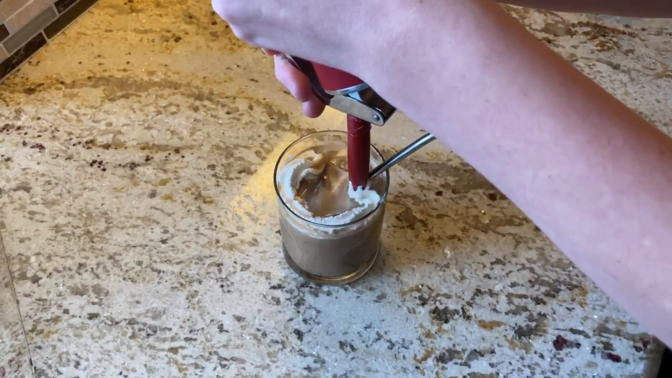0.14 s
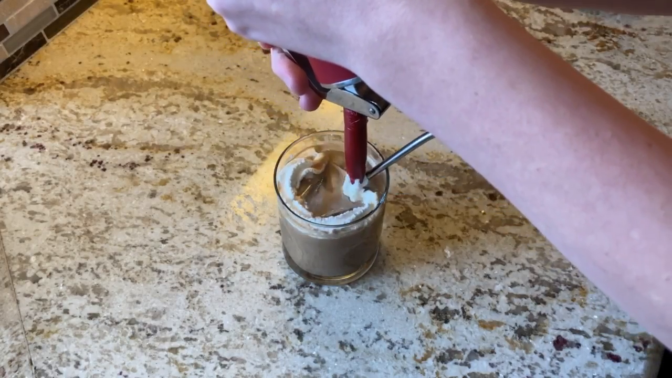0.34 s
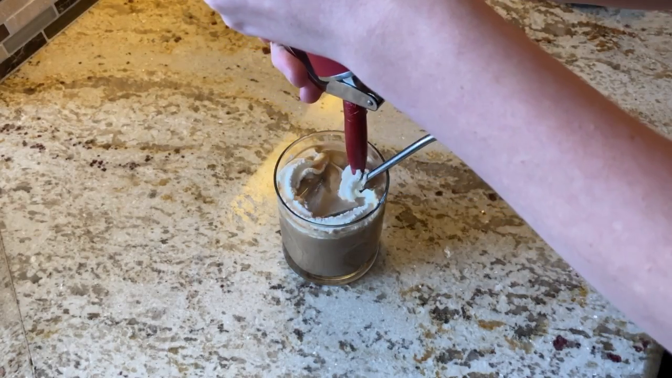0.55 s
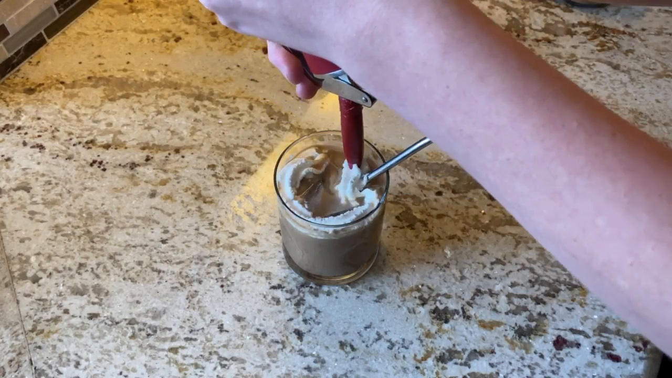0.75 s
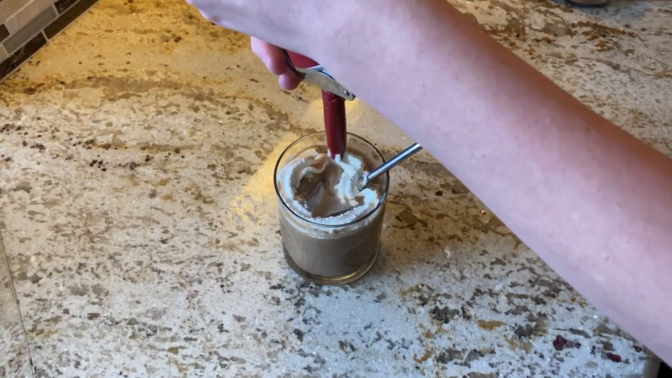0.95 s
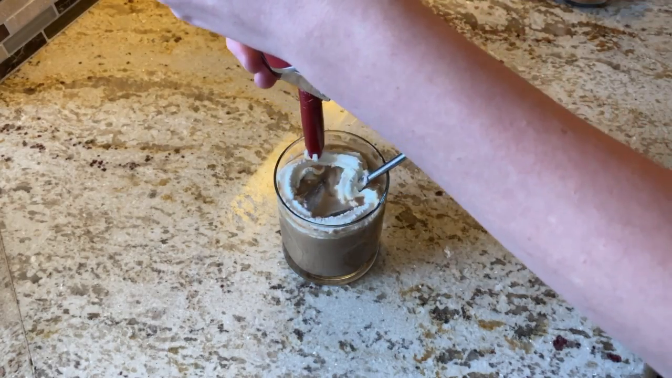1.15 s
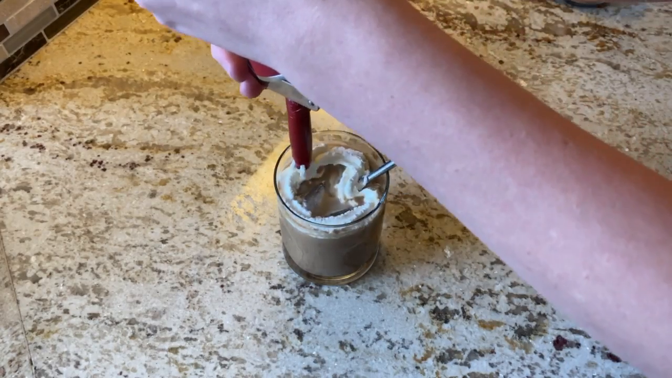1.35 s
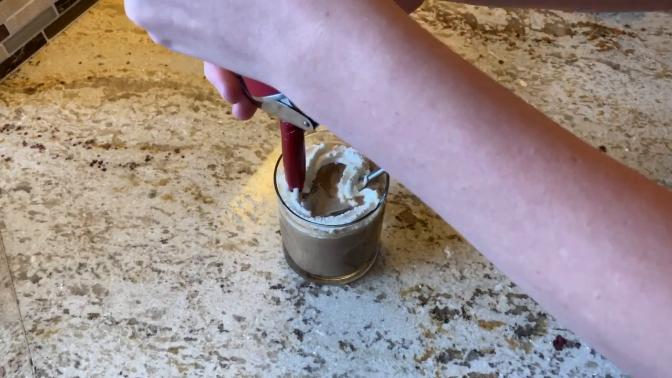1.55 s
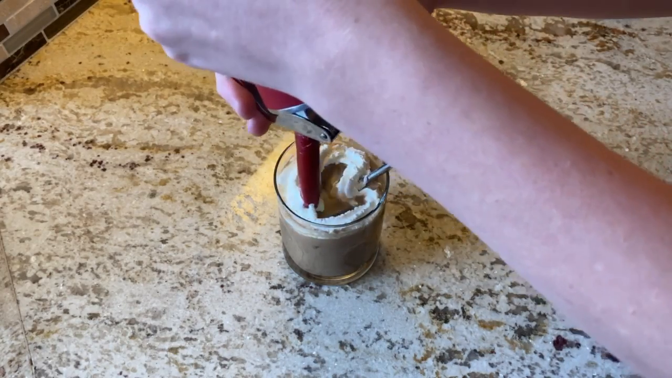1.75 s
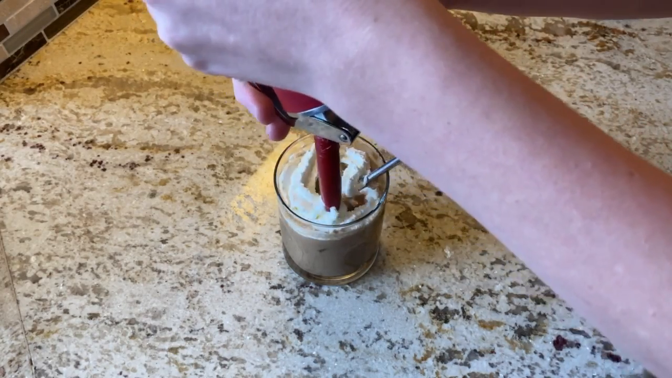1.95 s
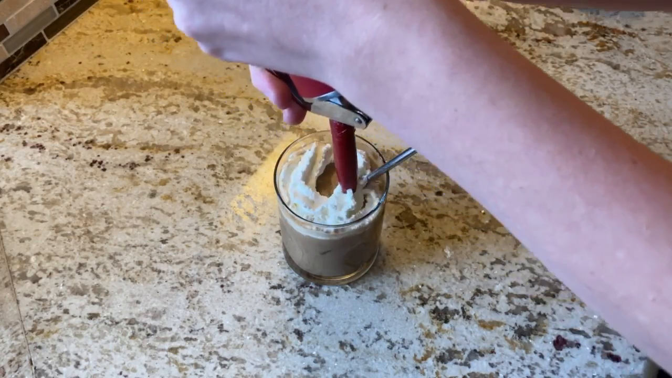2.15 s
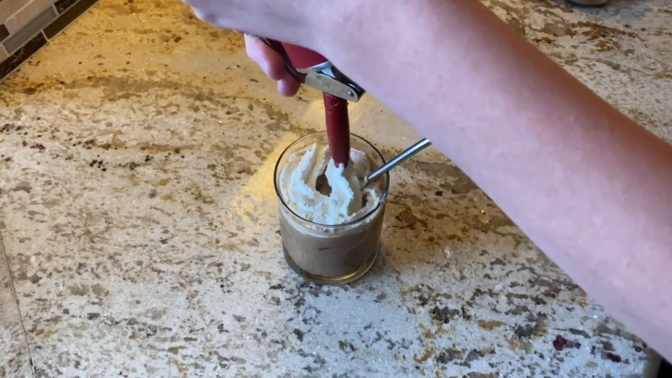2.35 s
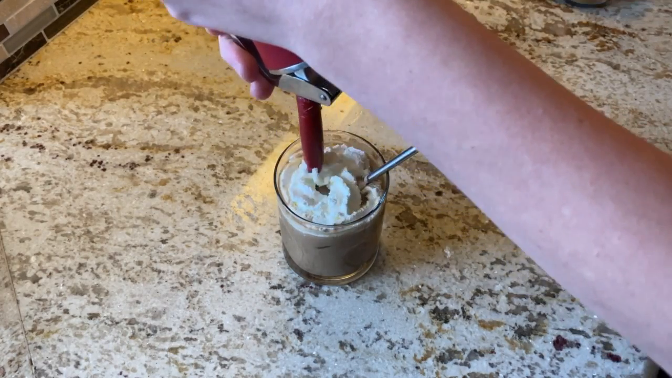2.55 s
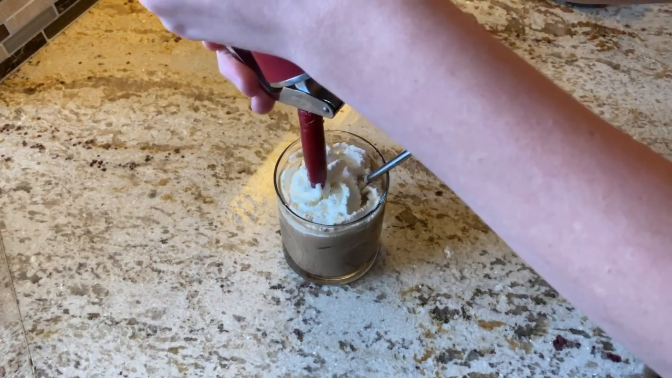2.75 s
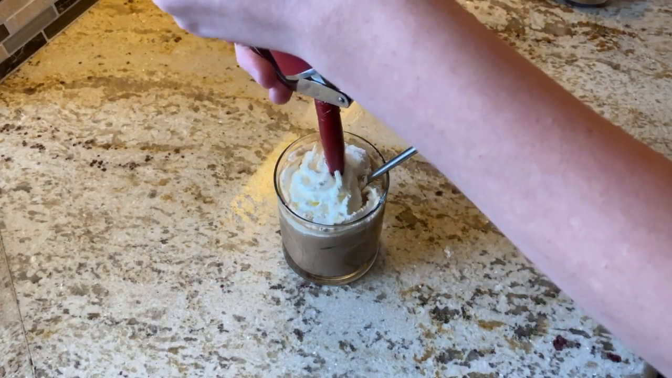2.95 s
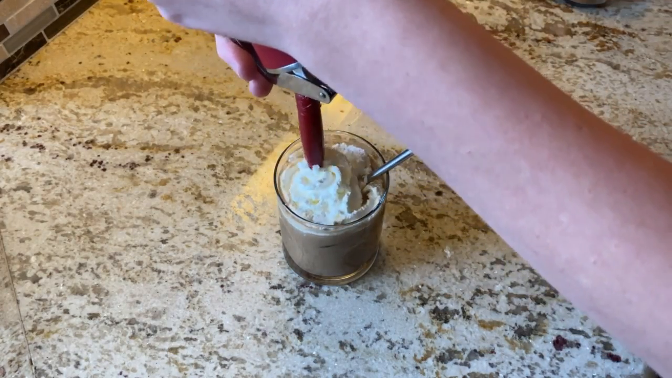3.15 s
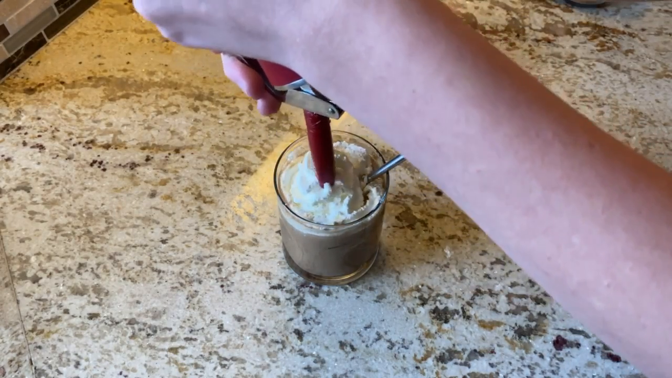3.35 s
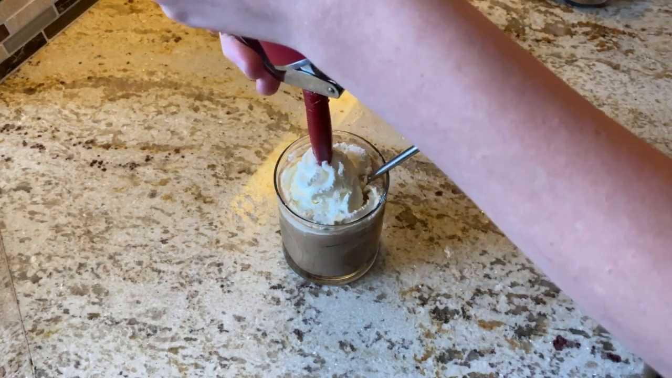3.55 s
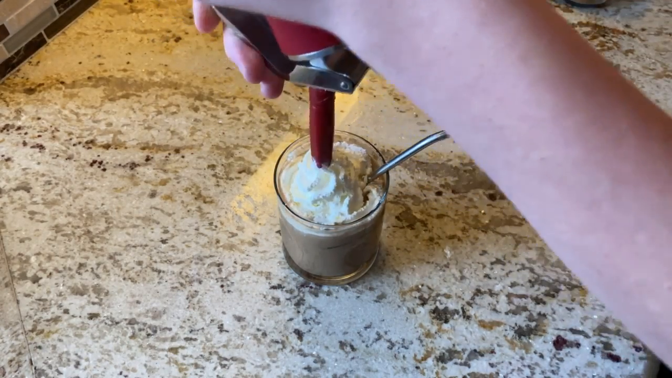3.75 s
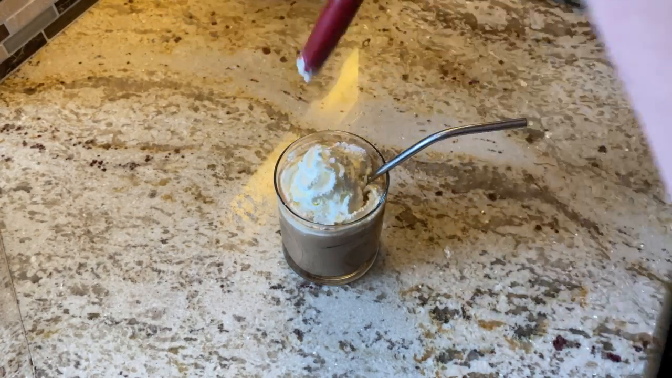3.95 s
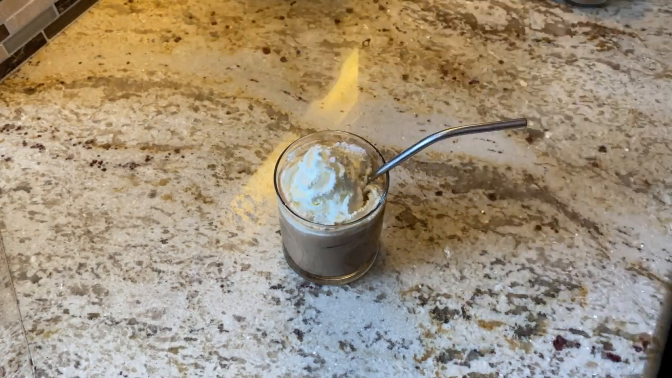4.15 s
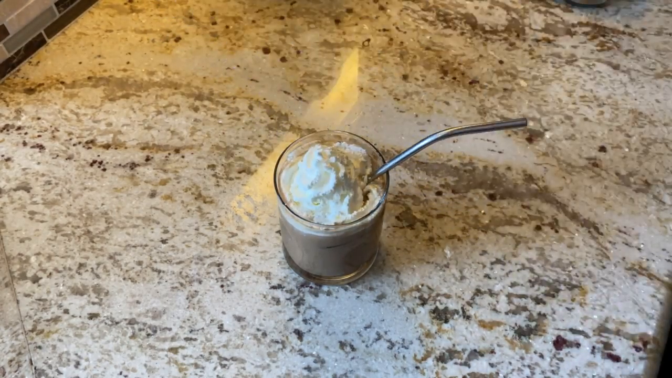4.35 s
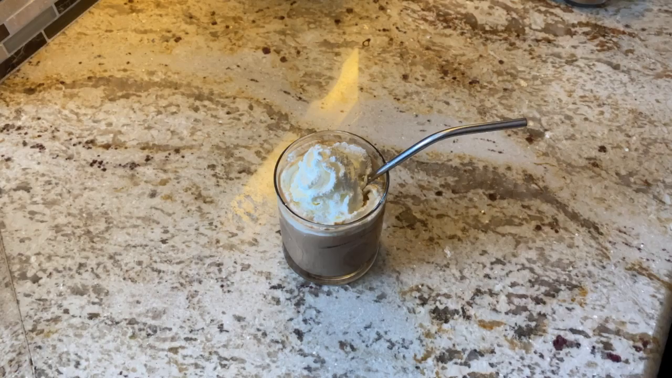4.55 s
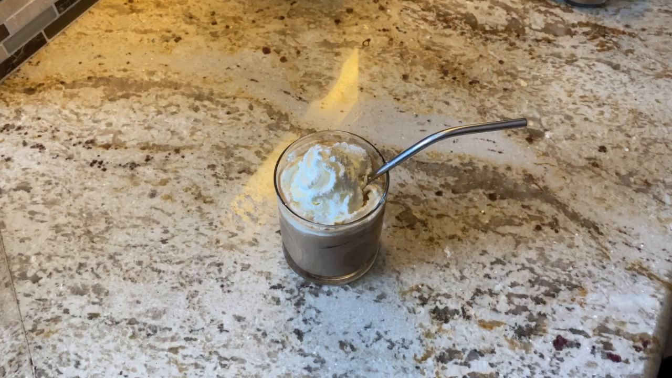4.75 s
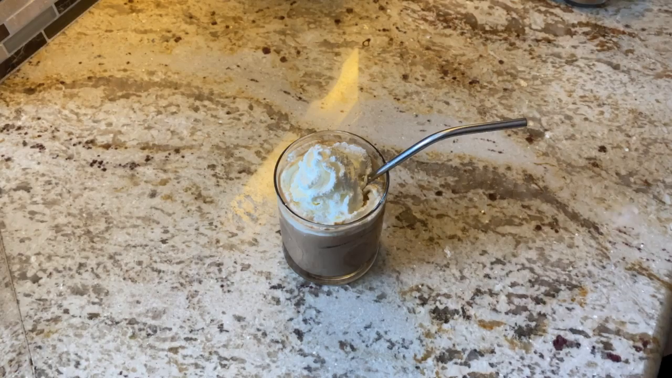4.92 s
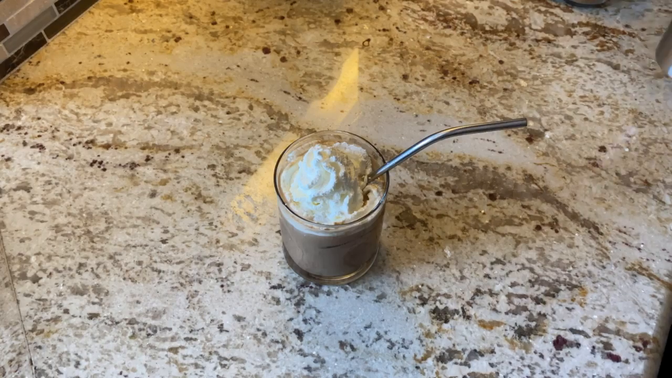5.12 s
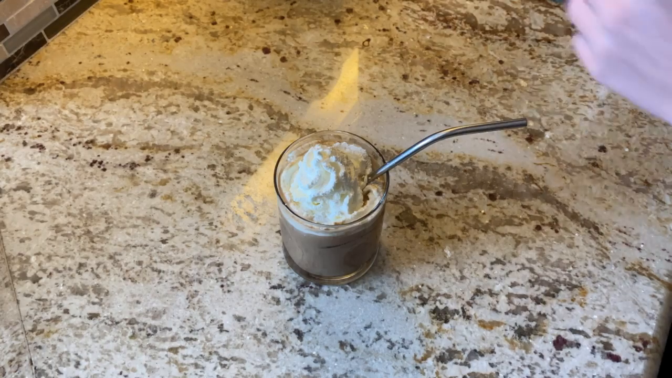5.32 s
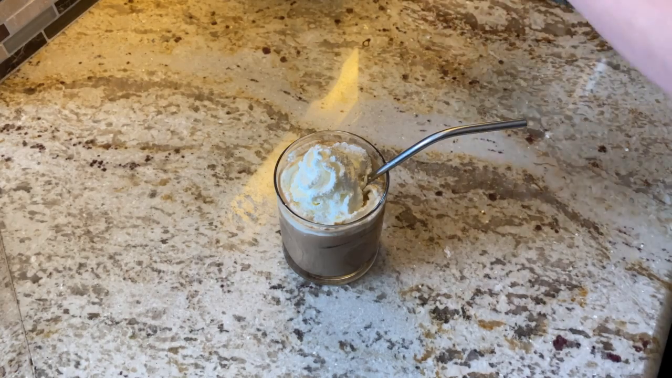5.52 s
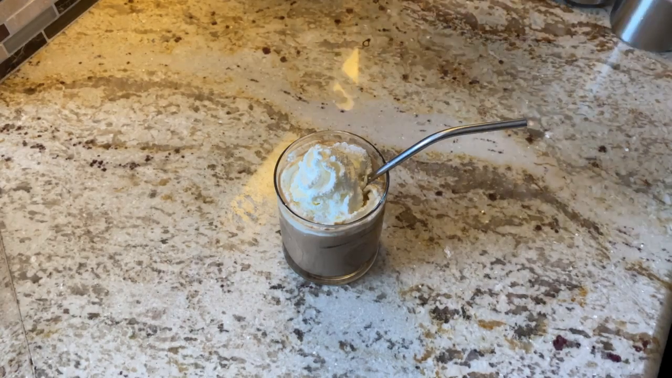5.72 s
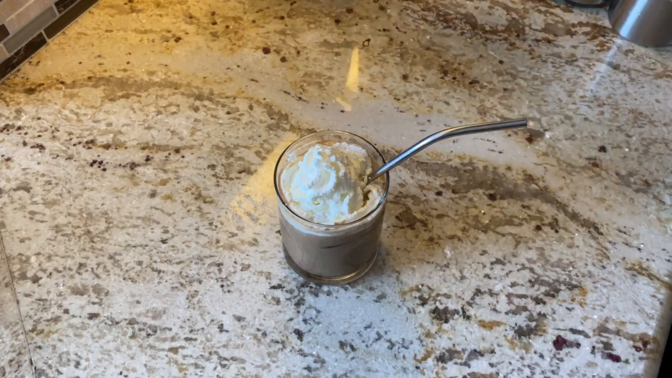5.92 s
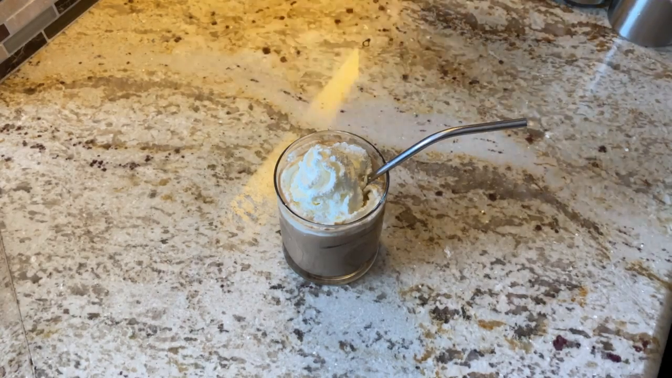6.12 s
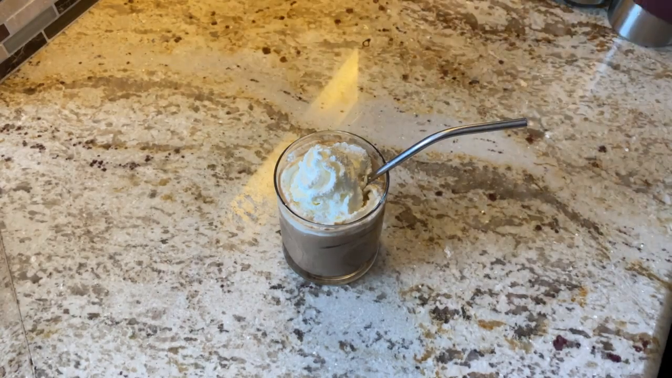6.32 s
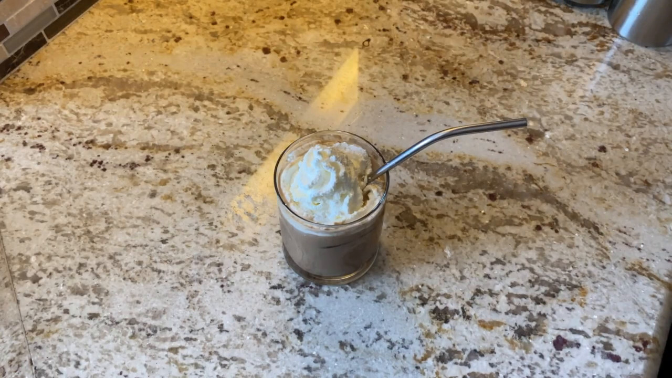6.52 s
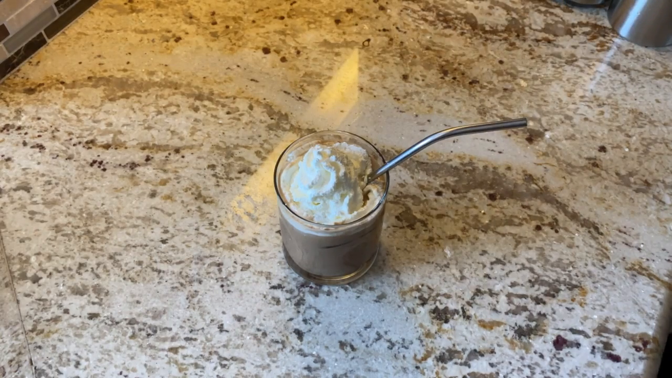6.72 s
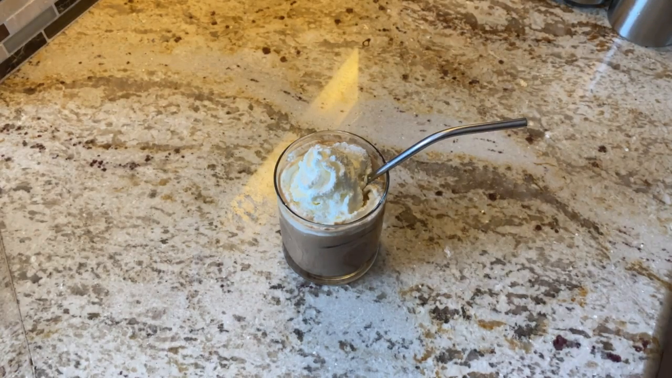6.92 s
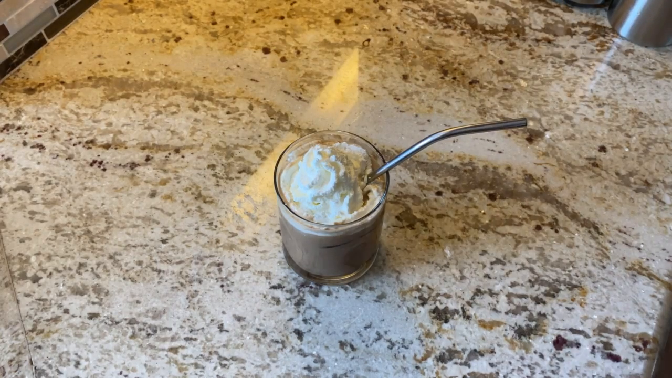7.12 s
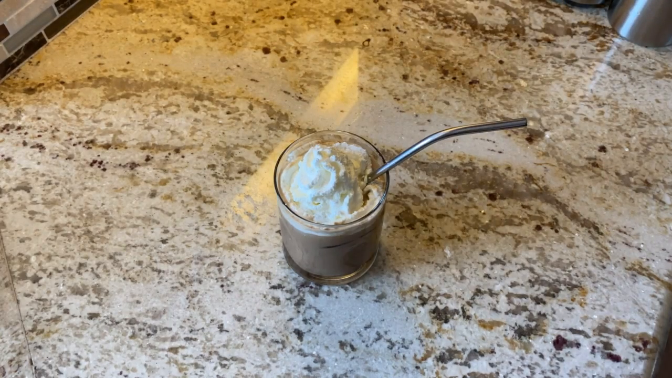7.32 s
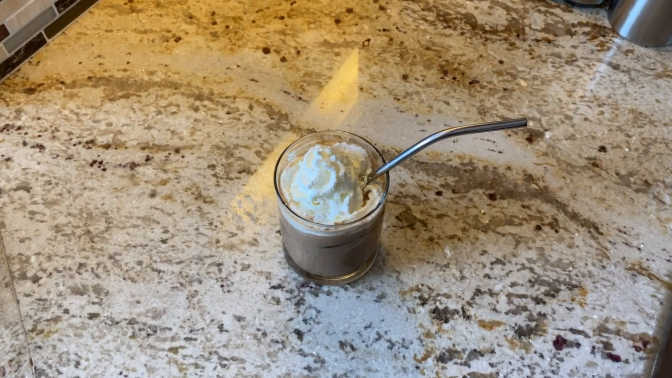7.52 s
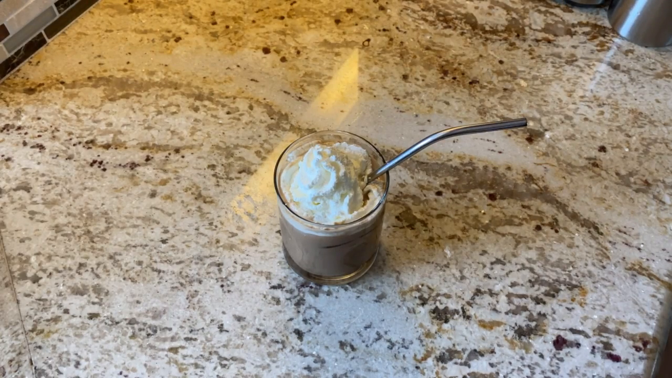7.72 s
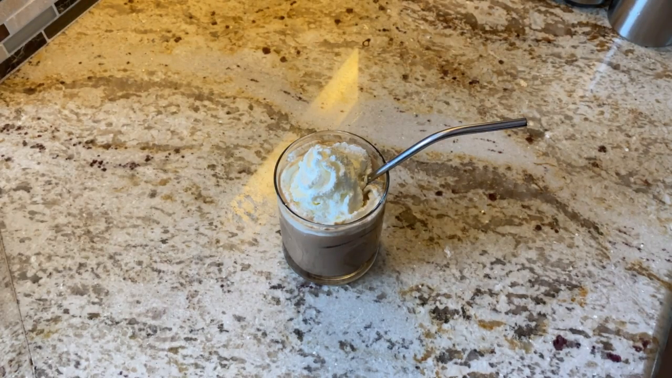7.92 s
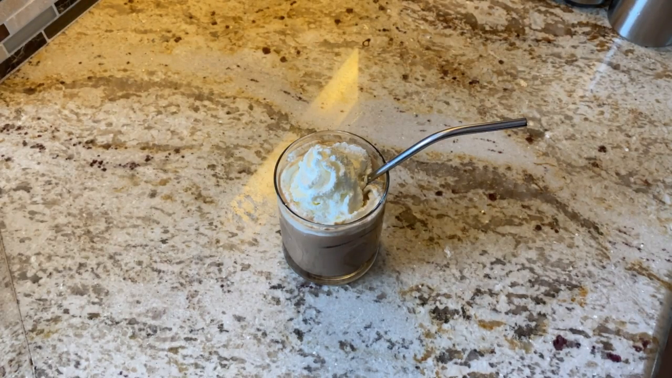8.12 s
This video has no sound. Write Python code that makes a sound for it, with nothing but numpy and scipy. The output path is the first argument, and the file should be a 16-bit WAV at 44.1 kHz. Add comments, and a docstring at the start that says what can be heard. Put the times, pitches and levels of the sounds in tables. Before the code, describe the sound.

Close in a hard-walled kitchen, a whipped cream dispenser sputters foam into a glass, irregular wet pops and gurgling crackle over a light hiss, growing denser before it cuts off with a lever click. Sleeves rustle and tiny ticks follow. To the right, a steel canister hits the stone counter twice, the second time harder, then a small hard part clacks down. A fridge hums quietly beneath, and the stereo phone pickup catches a short room tail.

```python
"""A hard-walled kitchen with a humming fridge, heard by a phone with two microphone ports.
In front of it a cream dispenser sputters foam into a glass: gas pockets pop in the nozzle over a jet hiss.
Then sleeves rustle, the steel canister is set down twice on a stone counter and a small hard part clacks down.
Noise and short pushes drive ringing modes; noise bursts make hiss, cloth and grit; noise tails make the room."""
import sys
import numpy as np
from scipy import signal
from scipy.fft import rfft, irfft, next_fast_len
from scipy.io import wavfile
from scipy.ndimage import uniform_filter1d

SR = 44100
rng = np.random.default_rng(int(sys.argv[2]) if len(sys.argv) > 2 else 0)


def to_wav(s):
    """Save 16-bit WAV."""
    ch = np.atleast_2d(s).T  # columns
    pcm = np.round(np.clip(ch, -1, 1) * 32767)  # PCM
    wavfile.write(sys.argv[1], SR, pcm.astype(np.int16))


def amplitude_ratio(level_db):
    """Convert a level in decibels to the matching linear amplitude (field) ratio."""
    exponent = np.asarray(level_db, float) / 20
    return 10 ** exponent


N = 364707
TIME = np.arange(N) / SR
HZ = np.fft.rfftfreq(next_fast_len(N), 1 / SR)

# Course of the spray. Each row: time in seconds, foam flow in dB, jet hiss in dB.
SPRAY_COURSE = [(0.0, -59, -64), (0.46, -69.5, -65), (0.59, -66, -66), (0.82, -57, -62.5),
                (0.99, -68.5, -61.5), (1.3, -56.5, -62), (1.59, -55, -60.5), (1.94, -51, -56),
                (2.09, -49, -56.5), (2.14, -57.5, -61), (2.19, -52, -58.5), (2.35, -52, -60.5),
                (2.67, -54.5, -58.5), (3.03, -50, -55), (3.37, -50.5, -56), (3.44, -49, -53),
                (3.49, -46.5, -54.5), (3.6, -66, -64), (3.72, -103, -73), (3.78, -120, -131)]
# Ring of a bursting gas pocket, only a cycle or two. Each row: pitch in Hz, level in dB, t60 in seconds.
POCKET_MODES = [(650, -16, .006), (1350, -1, .004), (1950, -2, .003), (2800, 0, .003), (3700, -4, .002)]


def level(x, db):
    """Set the rms level."""
    return x * amplitude_ratio(db) / np.sqrt(np.mean(x ** 2))


def shape(points, hz):
    """Value of a (Hz, value) table on a log-frequency axis, held flat beyond its ends."""
    f, v = np.transpose(points)
    return np.interp(np.log(hz + 1), np.log(f), v)


def colour(x, points):
    """Filter by a (Hz, dB) spectrum."""
    size = next_fast_len(N)
    return irfft(rfft(x, size) * amplitude_ratio(shape(points, HZ)), size)[:N]


def curves(table):
    """Columns of dB as gains at every sample, silent outside the table."""
    s, *columns = np.transpose(table)
    return [amplitude_ratio(np.interp(TIME, s, column, left=-150, right=-150)) for column in columns]


def walk(rate):
    """Random levels held 1 / rate s and slewed; spread near 1."""
    hold = int(SR / rate)
    return uniform_filter1d(np.repeat(rng.standard_normal(N // hold + 1), hold), hold)[:N]


def swells(s, db, rise_s, fall_s, hold_s):
    """Gain that climbs 20 dB in the rise time to each peak, holds and sinks 20 dB in the fall time."""
    gain = np.zeros(N)
    for at, top, rise, fall, hold in zip(s, db, rise_s, fall_s, hold_s):
        before = (at - TIME) / max(rise, .002)
        after = (TIME - at - hold) / max(fall, .002)
        gain += amplitude_ratio(top - 20 * np.maximum(np.maximum(before, after), 0))
    return gain


def ring(x, modes):
    """Decaying modes (Hz, dB, t60 of 2 ms or more) struck by x, neighbours in opposite phase."""
    out = 0
    for k, (hz, db, t60) in enumerate(modes):
        pole = np.exp(2j * np.pi * hz / SR - np.log(1000) / (max(t60, .002) * SR))
        out = out + (-1) ** k * amplitude_ratio(db) * signal.lfilter([1], [1, -pole], x).imag
    return out


def blows(times, dbs, contact_ms):
    """Half-sine pushes of unit area; a longer contact is duller."""
    out = np.zeros(N)
    for s, db, ms in zip(times, dbs, contact_ms):
        phase = np.minimum(np.arange(128) / (ms * SR / 1000), 1)
        push = np.maximum(np.sin(np.pi * phase), 0)
        start = int(s * SR)
        out[start:start + 128] += amplitude_ratio(db) * push / push.sum()
    return out


def puffs(times, dbs, decay_ms):
    """Noise bursts that start at once and die away."""
    starts = blows(times, dbs, np.full(len(times), .05))
    envelope = signal.lfilter([1], [1, -np.exp(-1000 / (decay_ms * SR))], starts)
    return envelope * rng.standard_normal(N)


def place(x, lag_ms, pan_db, early_db, tail_db):
    """Direct sound reaches the right port first; counter echoes and the room tail differ at each port."""
    # Decay of the kitchen. Each row: frequency in Hz, t60 in seconds.
    room_t60 = [(100, 0.31), (250, 0.76), (500, 0.78), (1000, 0.56), (2000, 0.72), (4000, 0.57),
                (8000, 0.53), (14000, 0.063)]
    t = TIME[:SR]
    noise = rfft(rng.standard_normal((2, SR)))
    octaves = np.log2(np.arange(noise.shape[1]) + 1)
    tail = np.zeros((2, SR))
    for hz in 60 * 2 ** np.arange(0, 8.5, .5):
        band = irfft(noise * np.maximum(1 - 2 * abs(octaves - np.log2(hz)), 0), SR)
        tail += band * np.exp(-np.log(1000) * t / shape(room_t60, hz))
    tail = tail * np.minimum(t / 0.0006, 1)
    early = rng.standard_normal((2, SR)) * np.exp(-t / 0.019) * (t > .0015)
    response = (level(tail, tail_db) + level(early, early_db)) / np.sqrt(SR)  # energy beside the direct sound
    response[0, int(round(lag_ms * SR / 1000))] += amplitude_ratio(pan_db / 2)  # positive pan is to the left
    response[1, 0] += amplitude_ratio(-pan_db / 2)
    return signal.fftconvolve(x[None], response, axes=1)[:, :N]


def kitchen():
    """Narrow noise bands waver as fridge lines, alike at both ports; the room air differs between them."""
    # Fridge lines. Each row: frequency in Hz, level in dB, width in Hz.
    lines = [(92, -65, 19), (112.6, -68, 7.1), (273.2, -75, 7.1), (387, -82, 12)]
    # Swell of the two lowest lines. Each row: time in seconds, relative level in dB.
    low_swell = [(0.0, -69), (0.14, -70), (0.87, -62), (1.77, -69), (2.44, -65), (2.88, -74), (3.45, -67.5),
                 (3.8, -71.5), (5.57, -62.5), (5.83, -53.5), (6.17, -66.5), (8.27, -68.5)]
    # Steady tones. Each row: frequency in Hz, level in dB.
    tones = [(1179, -89), (2541, -86.5), (2600, -90.5)]
    # Spectrum of the room air. Each row: frequency in Hz, relative level in dB per Hz.
    air_spectrum = [(16, -44), (28, -0.5), (109, -14.5), (216, -10.5), (268, -19.5), (388, -13.5),
                    (754, -29.5), (1220, -31), (1590, -38), (2240, -38), (2560, -35), (3080, -38),
                    (8460, -46.5), (13300, -54.5), (16000, -69.5)]
    mid, side = rng.standard_normal((2, N))
    side = colour(side, [(60, 12.5), (200, -1.0), (500, -1.5), (1500, 11.5), (4000, 3.0)])
    air = level(np.array([colour(mid + side, air_spectrum), colour(mid - side, air_spectrum)]), -56)
    hum = [level(ring(rng.standard_normal(N), [(hz, 0, 2.3 / width)]), db) for hz, db, width in lines]
    swell = curves(low_swell)[0]
    low_hum = (hum[0] + hum[1]) * swell / np.sqrt(np.mean(swell ** 2))
    whine = sum(level(np.sin(2 * np.pi * hz * TIME), db) for hz, db in tones)
    return air + whine + sum(hum[2:]) + low_hum


def rustle():
    """Sleeves and hands move: cloth slides with a fine grain, under a sheen of nearly white noise."""
    # Each row: peak time in seconds, cloth level in dB, sheen level in dB, rise and fall over 20 dB in seconds.
    moves = [(4.328, -65.5, -68, 0.028, 0.24), (4.55, -72, -69.5, 0.069, 0.41),
             (4.908, -68, -67, 0.12, 0.09), (5.472, -64.5, -64.5, 0.17, 0.14),
             (6.269, -66.5, -78.5, .2, 0.2), (6.46, -76, -72.5, 0.091, 0.23), (6.561, -79.5, -66, 0.22, .2),
             (6.9, -75, -95, 0.1, .3), (7.049, -67, -61.5, .006, 0.32), (7.223, -64, -59, 0.085, .03)]
    # Spectrum of the cloth. Each row: frequency in Hz, relative level in dB per Hz.
    cloth_spectrum = [(290, -38), (500, 2), (585, -1.5), (637, -6.5), (693, -7), (1060, -1), (3590, -12.5),
                      (9000, -26), (11700, -34), (19800, -120)]
    s, body_db, sheen_db, rise_s, fall_s = np.transpose(moves)
    grain = rng.standard_normal((2, N)) * amplitude_ratio(3.0 * walk(60))
    cloth = level(colour(grain[0], cloth_spectrum), 0)
    sheen = level(colour(grain[1], [(5000, -5.0), (9000, -6.0), (12000, -6.0), (15000, -3.0)]), 0)
    no_hold = 0 * s
    return swells(s, body_db, rise_s, fall_s, no_hold) * cloth + swells(s, sheen_db, rise_s, fall_s, no_hold) * sheen


def ticks():
    """Each tick of lever and metal is a short ring at its own pitch and a tiny crack."""
    # Each row: start in seconds, level in dB, pitch in Hz, ring t60 in seconds, grit against the level in dB.
    small_ticks = [(3.7894, -43.5, 3300, 0.011, -10.5), (3.79, -56, 3600, .06, -16),
                   (3.792, -57, 4380, 0.036, -34), (3.961, -63, 2300, 0.0082, 3),
                   (4.263, -68, 2500, .008, -4.5), (4.318, -55, 1960, 0.0071, -8),
                   (4.3558, -55, 2540, .008, 2.5), (6.2757, -51.5, 1750, 0.0066, -10),
                   (6.279, -59, 4700, 0.01, -12), (6.553, -57, 4700, 0.012, 8.5),
                   (6.69, -67, 4830, 0.11, -20), (6.885, -57, 1797, .03, -14.5),
                   (7.0432, -43.5, 1665, 0.0073, -8), (7.788, -53, 3233, 0.029, -18),
                   (7.7877, -59.5, 8380, 0.013, -23)]
    rings = sum(ring(blows([s], [db], [.1]), [(hz, -4, t60)]) for s, db, hz, t60, _ in small_ticks)
    s, db, _, _, grit_db = np.transpose(small_ticks)
    crack = amplitude_ratio(11.5) * puffs(s, db + grit_db, 0.58)
    grit = amplitude_ratio(-6.0) * puffs(s, db + grit_db, 7.5)
    return rings + colour(crack + grit, [(900, -31), (2000, -7.5), (4000, 0.0), (8000, -11.5), (15000, -10.5)])


def knocks(table, modes, crack_spectrum):
    """A blow rings the object, thuds in the counter and cracks at the contact."""
    # Counter and cupboard below. Each row: pitch in Hz, level in dB, t60 in seconds.
    counter_modes = [(53.4, -16.5, .12), (72, -16, 0.29), (93.7, -12, 0.29), (122, -2, 0.12),
                     (167, 2.5, 0.043), (199.2, -3.5, 0.1), (261.7, -3.5, 0.2), (370, -8.5, 0.068),
                     (405, -1, 0.13), (426, 5.5, 0.033)]
    s, body_db, thud_db, crack_db, ms = np.transpose(table)
    body = amplitude_ratio(-0.5) * ring(blows(s, body_db, ms), modes)
    thud = amplitude_ratio(-6.0) * ring(blows(s, thud_db, 3 * ms), counter_modes)
    snap = amplitude_ratio(24.0) * blows(s, crack_db, np.full(len(s), .06))
    grit = amplitude_ratio(-1.0) * puffs(s, crack_db, 3.3)  # under the rim
    return body + thud + colour(snap + grit, crack_spectrum)


def small_part():
    """A small hard part clacks down; it is too small to radiate bass."""
    # Each row: start in seconds, body, thud and crack levels in dB, contact in ms.
    clacks = [(7.2384, -15.5, -21, -17.5, 0.27), (7.2417, -28, -56, -45.5, 0.32),
              (7.2442, -31.5, -58, -45, 0.22), (7.262, -17, -21, -46, 1.05),
              (7.2865, -23.5, -51.5, -42, 0.71)]
    # Modes of the part. Each row: pitch in Hz, level in dB, t60 in seconds.
    part_modes = [(355, -10, 0.13), (465, -14, 0.13), (888, -12, 0.025), (1000, -4, 0.012),
                  (1275, -13, 0.13), (1650, -6, 0.012), (1860, 15.5, 0.002), (2037, -10, 0.09),
                  (2200, -5, 0.012), (2495, -6, 0.045), (2541, -19, 0.12), (2828, -3, 0.035),
                  (3200, -10, 0.012), (3472, -14, 0.08), (3612, -15, 0.07), (4285, -19, 0.05),
                  (8400, 11, 0.007)]
    # Spectrum of the crack. Each row: frequency in Hz, gain in dB.
    crack_spectrum = [(2000, -4), (3500, 2), (4500, -13), (6500, -13), (8300, -4), (10000, -13.5),
                      (13000, -9), (16000, -9.5)]
    # Weak bass. Each row: frequency in Hz, gain in dB.
    weak_bass = [(120, -22), (190, -11), (330, -9), (600, -7), (900, 2.5)]
    return colour(knocks(clacks, part_modes, crack_spectrum), weak_bass)


def canister():
    """The steel canister meets the counter in two clusters of blows that ring its wall."""
    # Each row: start in seconds, body, thud and crack levels in dB, contact in ms.
    contacts = [(5.5005, -14.5, -25.5, -43.5, 0.25), (5.5045, -12.5, -16.5, -26.5, 0.49),
                (5.508, -23, -24.5, -26, 0.6), (5.532, -36.5, -45.5, -63, 0.8),
                (5.555, -39, -44, -54.5, 0.35), (5.58, -34, -49.5, -53.5, 0.52),
                (5.606, -27.5, -33, -41.5, 0.56), (5.622, -39, -40, -57, 0.7),
                (5.66, -40.5, -50.5, -61, 0.65), (5.7215, -29, -55, -34, 0.26),
                (5.736, -3, -13.5, -20, 0.41), (5.7385, -16.5, -40.5, -27.5, 0.65),
                (5.7415, -7, -29, -47, 0.73), (5.817, -41, -39, -44.5, 0.85), (5.88, -28, -28.5, -52.5, 1),
                (5.895, -26, -29, -60, 0.93), (6.022, -34.5, -34, -58, 0.84)]
    # Modes of the canister wall. Each row: pitch in Hz, level in dB, t60 in seconds.
    wall_modes = [(610, -11, 0.048), (740, -4.5, 0.02), (818, -3.5, 0.035), (944, 0, 0.023),
                  (1040, -8, 0.038), (1164, -2.5, 0.025), (1242, 8, 0.0017), (1290, -1.5, 0.036),
                  (1493, 4.5, 0.015), (1665, -4.5, 0.023), (1790, -7, 0.02), (2320, -3, 0.015),
                  (2800, -2, 0.011), (4180, -21, .006)]
    # Spectrum of the crack. Each row: frequency in Hz, gain in dB.
    crack_spectrum = [(2000, -9.5), (3500, 3), (5000, -6), (6500, -8), (8300, -2.5), (10000, -8),
                      (13000, -5.5), (16000, -6)]
    return knocks(contacts, wall_modes, crack_spectrum)


def scattered(x):
    """The wall just behind the canister gives each port its own quick copy of a knock."""
    # Wall echo at the left, then the right port. Each row: delay in ms, level against the knock in dB.
    wall_echo = [(1.05, -5), (1.7, -5)]
    echo = [amplitude_ratio(db) * np.interp(TIME - ms / 1000, TIME, port) for port, (ms, db) in zip(x, wall_echo)]
    return (x + echo) * amplitude_ratio(-5.0)


def pockets(hiss):
    """The loud gas pockets, joined by lesser ones at chance moments that grow with the jet."""
    # Loudest pockets. Each row: start in seconds, level in dB, then brightness and following spurt in dB.
    loud_pockets = [(0.036, -37.5, -14, -17), (0.093, -43.5, -15, -3), (0.156, -39.5, -25, -6),
                    (0.222, -43.5, -15, -13.5), (0.269, -46, -21, -15), (0.284, -40, -10, -15),
                    (0.361, -38.5, -17, -13), (0.381, -48, -16, -20), (0.435, -42, -10.5, -13),
                    (0.496, -53.5, -14, -3.5), (0.525, -42, -21, -18), (0.558, -42, -14, -15),
                    (0.572, -49, -14, -16), (0.583, -34, -20, -14.5), (0.639, -38.5, -17, -19),
                    (0.659, -39, -20, -14), (0.71, -35.5, -24, -15), (0.734, -37.5, -21, -9),
                    (0.794, -34.5, -27, -17), (0.827, -37, -29, -10), (0.869, -37, -26, -17),
                    (0.909, -52, -5, -10), (0.921, -39.5, -20, -17), (0.965, -34, -29, -10),
                    (1.005, -35.5, -20, -10), (1.083, -42, -22, -5.5), (1.119, -45.5, -19, 0),
                    (1.169, -40.5, -17, -5), (1.232, -37, -16, -8.5), (1.26, -36.5, -17, -22),
                    (1.289, -35.5, -23, -19), (1.318, -35.5, -21, -6.5), (1.381, -46, -23, -19),
                    (1.442, -42, -12, -11), (1.461, -39.5, -33, -12), (1.498, -41.5, -23, -2.5),
                    (1.544, -39.5, -29, -9), (1.586, -56, -7, -5), (1.661, -43, -27, -13),
                    (1.684, -45, -26, -17), (1.693, -38, -24, -6), (1.803, -50, -23, -19),
                    (1.828, -40, -27, -22), (1.858, -37.5, -24, -22), (1.888, -39, -21, -24),
                    (1.912, -37, -19, -22), (1.948, -43, -14, -14), (1.976, -35, -22, -12),
                    (1.985, -37.5, -27, -12), (2.006, -36.5, -22, -7.5), (2.028, -34.5, -14, -10),
                    (2.068, -38, -20.5, -7.5), (2.081, -39.5, -26, -7.5), (2.147, -57, -25, -16),
                    (2.163, -34, -21, -9.5), (2.2, -32, -27, -15), (2.213, -30, -30, -16),
                    (2.233, -35, -27, -15), (2.256, -44, -20, -24), (2.275, -38, -35, -12),
                    (2.297, -32.5, -15, -12), (2.36, -38, -21, -2.5), (2.397, -39, -20, -22),
                    (2.423, -43, -6.5, -9.5), (2.456, -45, -23, -16), (2.478, -35.5, -13, -16),
                    (2.506, -36.5, -11.5, -12.5), (2.527, -31.5, -21, -12), (2.576, -42, -7, -11),
                    (2.599, -41, -12, -3.5), (2.619, -33, -19, -9.5), (2.649, -37, -14, -8),
                    (2.664, -36, -13.5, -9.5), (2.696, -42, -12, -8), (2.722, -38, -18, -3),
                    (2.768, -44, -23, -10), (2.828, -35, -20, -4.5), (2.846, -46, -23, -5),
                    (2.897, -34, -15, -10), (2.946, -36.5, -25, -3.5), (2.977, -34.5, -16, -20),
                    (3.009, -53, -9, -24), (3.033, -33, -13.5, -7), (3.068, -37, -24, -15),
                    (3.094, -35, -11, -7.5), (3.126, -37, -8, -26), (3.146, -34, -11, -13),
                    (3.157, -37, -5, -15), (3.182, -33, -23, -10.5), (3.208, -45, -29, -20),
                    (3.224, -32, -14, -14), (3.285, -36, -29, -28), (3.324, -40, -15, -13),
                    (3.36, -36, -10, -13), (3.39, -46.5, 1, -8), (3.442, -48, -21, -16),
                    (3.455, -53, -15, -19), (3.502, -37, -6, -20), (3.529, -29.5, -22, -9),
                    (3.598, -44.5, -4, -12), (3.629, -42.5, -12, -15)]
    small_per_s, over_hiss_db, scatter_db, bright_db, spurt_db = 7, 15, 3.5, -19, -19.
    end_s = SPRAY_COURSE[-1][0]
    when, size, tone = rng.random((int(small_per_s * end_s), 3)).T
    s = when * end_s
    db = 20 * np.log10(hiss[(s * SR).astype(int)]) + over_hiss_db + scatter_db * (2 * size - 1)
    bright = bright_db + scatter_db * (2 * tone - 1)
    small = np.array([s, db, bright, np.full(len(s), spurt_db)])
    return np.hstack([np.transpose(loud_pockets), small])


def bursts(times, dbs):
    """Each pocket rings at a pitch set by its own size; a larger one is lower and longer."""
    out, t = np.zeros(N), TIME[:400, None]
    hz, db, t60 = np.transpose(POCKET_MODES)
    sign = (-1.) ** np.arange(len(hz))
    sizes = 2 ** (.13 * rng.standard_normal(len(times)))  # spread in octaves
    for s, top_db, size in zip(times, dbs, sizes):
        decay = np.exp(-np.log(1000) * t / (t60 * size))
        pop = sign * amplitude_ratio(db) * np.sin(2 * np.pi * hz * t / size) * decay
        start = int(s * SR)
        out[start:start + len(t)] += amplitude_ratio(top_db) * pop.sum(axis=1)
    return out


def slosh(x, modes):
    """Modes wander slightly in pitch and strength at random, each on its own."""
    drift, waver_db = .02, 2  # drift is a share of the pitch
    out = 0
    for k, (hz, db, t60) in enumerate(modes):
        turn = np.exp(2j * np.pi * np.cumsum(hz * (1 + drift * walk(9))) / SR)
        held = signal.lfilter([1], [1, -np.exp(-np.log(1000) / (t60 * SR))], x / turn)
        out = out + (-1) ** k * amplitude_ratio(db + waver_db * walk(14)) * (held * turn).imag
    return out


def patchy(x, patch_db, rate):
    """Stretches of 0.6 octave swell and sink each on its own; all below 2 kHz goes with the lowest."""
    size = next_fast_len(N)
    spectrum = rfft(x, size)
    octaves = np.log2(np.clip(HZ, 2000, 16000) / 2000)
    bands = [irfft(spectrum * np.maximum(1 - abs(octaves / .6 - k), 0), size)[:N] for k in range(6)]
    return sum(band * amplitude_ratio(patch_db * walk(rate)) for band in bands)


def spray():
    """Clustered gas bursts ring the nozzle; each big one lets a spurt through; the jet hisses along."""
    # Modes of nozzle and glass. Each row: pitch in Hz, nominal width in Hz, level in dB.
    nozzle = [(215, 70, -4), (375, 60, -7.5), (640, 105, 0), (1004, 45, -7), (1164, 70, -2.5),
              (1295, 50, -9), (1477, 120, -3), (1600, 170, 1), (1830, 190, -3), (2200, 400, -5),
              (2500, 400, 1), (2900, 530, 4), (3720, 600, 2)]
    # Spectrum of the jet hiss. Each row: frequency in Hz, relative level in dB per Hz.
    jet_spectrum = [(2000, -16.5), (3300, -21), (4100, -2), (5350, -6), (6400, -10), (7500, -17),
                    (8200, -11.5), (10000, -8), (14900, -4), (16000, -8)]
    # Spectrum of the wet squirts. Each row: frequency in Hz, relative level in dB per Hz.
    wet_spectrum = [(1000, -50), (1600, 6), (2200, -4.5), (2600, 7), (3300, 9), (4200, 8), (5200, -2),
                    (6600, -1.5), (8500, -10), (10300, -14), (15600, -44)]
    # Wet squirts out of the tip. Each row: peak time in seconds, level in dB, rise over 20 dB in seconds,
    # hold in seconds, fall over 20 dB in seconds.
    wet_squirts = [(0.092, -49.5, 0.003, 0.0082, 0.095), (0.287, -57, .01, 0.0081, 0.029),
                   (0.64, -52.5, 0.0052, 0.011, 0.027), (0.737, -43, 0.0054, 0.03, 0.2),
                   (1.15, -56.5, 0.12, 0.032, 0.18), (2.015, -64, 0.052, 0.035, 0.037),
                   (2.172, -62.5, .04, 0.15, 0.12), (2.596, -57, 0.06, 0.03, 0.14),
                   (2.83, -61, 0.044, 0.1, 0.091), (3.027, -48.5, 0.005, 0.0098, 0.052),
                   (3.147, -53, 0.014, 0.012, 0.066), (3.343, -55.5, 0.013, 0.053, 0.068),
                   (3.56, -59, 0.032, 0.03, 0.039), (3.666, -62, 0.013, 0.017, 0.018)]
    flow, hiss = curves(SPRAY_COURSE)
    s, db, bright_db, spurt_db = pockets(hiss)
    modes = [(hz, mode_db, 2.84 / width) for hz, width, mode_db in nozzle]

    clusters = amplitude_ratio(2.3 * walk(70))
    chance = rng.random((2, N))
    bubbles = chance[0] < 800 / SR  # about 800 a second
    crackle = bubbles * amplitude_ratio(-3.5 * np.log(chance[1] + 0.017)) * clusters  # few large, many small
    gurgle = level(crackle - crackle.mean(), 0) + level(rng.standard_normal(N) * clusters, -14.5)
    foam = level(slosh(gurgle, modes), -2.5) + level(ring(gurgle, POCKET_MODES), -8.0)
    foam = flow * amplitude_ratio(1.2 * walk(18)) * foam

    pop_s = s + 0.001195  # each pop starts about a millisecond after its leak noise
    pops = -amplitude_ratio(4.5) * colour(bursts(pop_s, db), [(300, -21), (900, 0.0)])
    spurts = slosh(puffs(s, db + spurt_db, 14.5), modes)
    spurts = amplitude_ratio(-24.5) * colour(spurts, [(200, -2), (700, -1), (1200, -1.5)])
    leak = puffs(s, db + bright_db, 0.64) * amplitude_ratio(13)
    longer_leak = puffs(s, db + bright_db + spurt_db, 8.7) * amplitude_ratio(19)
    spit = colour(leak + longer_leak, jet_spectrum)

    flutter = amplitude_ratio(3 * walk(70)) * np.sqrt(clusters)
    jet = level(colour(rng.standard_normal(N) * flutter + 1.17 * gurgle, jet_spectrum), 0.91)
    wet = rng.standard_normal(N) * amplitude_ratio(2.0 * walk(150)) + 0.6 * gurgle
    wet = level(colour(wet, wet_spectrum), -2.65)
    at, peak_db, rise_s, hold_s, fall_s = np.transpose(wet_squirts)
    wet_gain = swells(at, peak_db, rise_s, fall_s, hold_s) + amplitude_ratio(-15) * hiss  # a steady dribble follows the jet
    return foam + pops + spurts + spit + patchy(hiss * jet + wet_gain * wet, patch_db=2.5, rate=25)


def scene():
    """Spray in front of the phone, hands and knocks off to the right, the kitchen all round."""
    hands = place(rustle() + ticks(), lag_ms=.43, pan_db=-3.5, early_db=-6, tail_db=-5.5)
    steel = scattered(place(canister(), lag_ms=.2, pan_db=-2.5, early_db=-7, tail_db=-8.5))
    part = place(small_part(), lag_ms=.43, pan_db=-5, early_db=-7, tail_db=-11.5)
    foam = place(spray(), lag_ms=.13, pan_db=1.0, early_db=-17, tail_db=-11)
    return kitchen() + hands + steel + part + foam


def roll_off(x):
    """The treble ends steeply here."""
    return signal.sosfilt(signal.butter(12, 16650, fs=SR, output="sos"), x)


def record(dry):
    """Deep bass is cut, the low bass is narrowed; the top octave is nearly mono, taken from the right channel."""
    dry = signal.sosfilt(signal.butter(N=6, Wn=40, btype="high", fs=SR, output="sos"), dry)
    mid, side = (dry[0] + dry[1]) / 2, (dry[0] - dry[1]) / 2
    mid = mid - colour(side, [(8000, -40), (10000, 0)])  # mid minus side is the right channel
    mid = colour(mid, [(9000, 1.5), (11000, -5.0), (15700, -4.0), (16100, -41.5)])
    side = colour(side, [(35, -24.5), (60, -8.0), (150, -7.5), (320, 2.5), (9000, -1.0), (11000, -15.5),
                         (15700, -19.5), (16100, -68.0)])
    return roll_off(np.array([mid + side, mid - side]))


dry = scene()
out = record(dry)
to_wav(out)
```